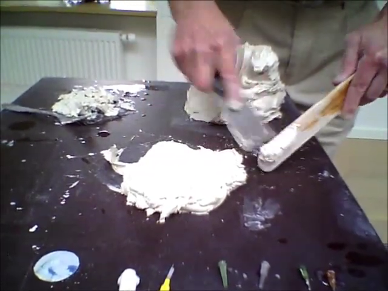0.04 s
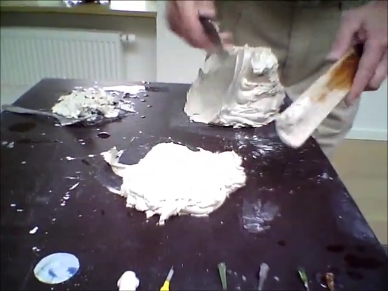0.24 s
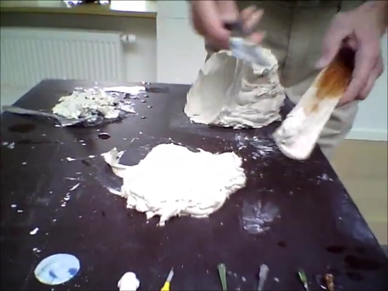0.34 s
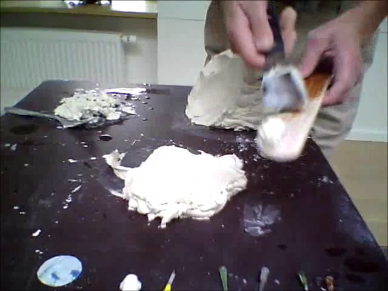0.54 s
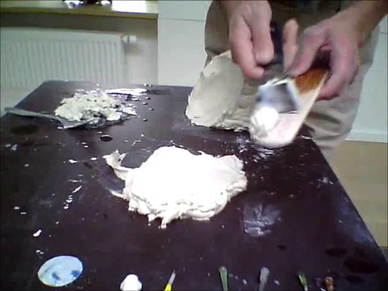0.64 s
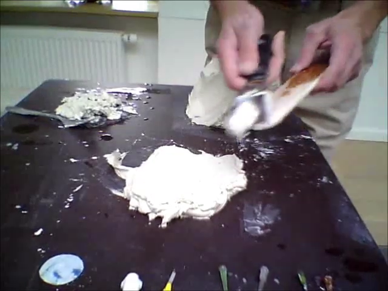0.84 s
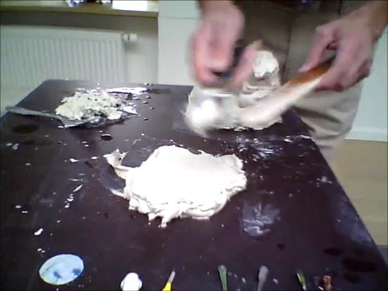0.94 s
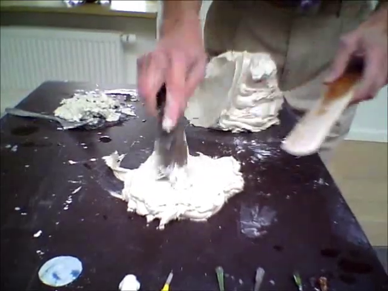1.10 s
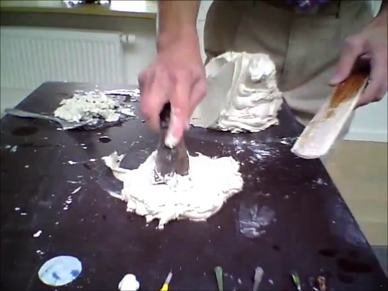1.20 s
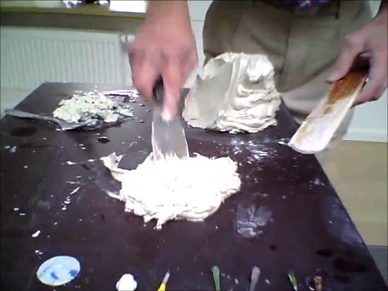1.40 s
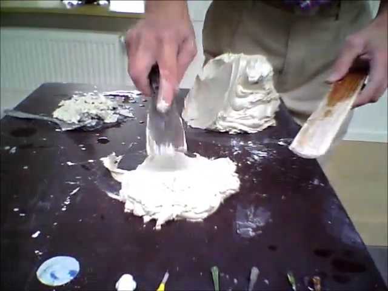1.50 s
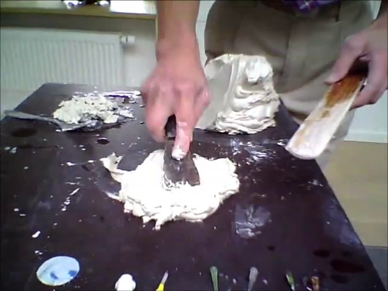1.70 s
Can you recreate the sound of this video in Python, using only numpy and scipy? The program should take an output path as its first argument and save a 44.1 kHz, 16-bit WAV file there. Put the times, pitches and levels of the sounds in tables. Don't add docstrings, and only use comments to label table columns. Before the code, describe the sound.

Steel blade wiping soft clay from wood, quick bright clacks, a light tap and faint smearing.

```python
import sys
import numpy as np
from scipy import signal
from scipy.fft import rfft, irfft
from scipy.io import wavfile

SR = 44100
rng = np.random.default_rng(int(sys.argv[2]) if len(sys.argv) > 2 else 0)


def unload_wav(signal):
    wavfile.write(
        sys.argv[1],
        SR,
        np.round(np.clip(np.atleast_2d(signal).T, -1, 1) * 32767).astype(np.int16),
    )


def attenuation_scalar(level_db):
    decades = np.asarray(level_db, float) / 20
    return 10 ** decades


N = 77175
T = np.arange(N) / SR


def rms_one(x):
    return x / np.sqrt(np.mean(x ** 2) + 1e-20)


def at_hz(points, hz):
    points = np.array(points)
    return np.interp(np.log(hz), np.log(points[:, 0]), points[:, 1])


def drift(rate_hz):
    pole = np.exp(-80 * np.pi * rate_hz / SR)
    noise = rng.standard_normal(N // 40 + 2002)
    slow = signal.lfilter([1], [1, -2 * pole, pole * pole], noise)[2000:]
    return np.interp(np.arange(N) / 40, np.arange(len(slow)), rms_one(slow - slow.mean()))


def band_pass(x, low_hz, high_hz):
    sos = signal.butter(2, [low_hz, high_hz], "band", fs=SR, output="sos")
    return signal.sosfilt(sos, x)


def ring(clicks, hz, t60):
    r = attenuation_scalar(-60 / (t60 * SR))
    w = 2 * np.pi * hz / SR
    return signal.lfilter([0, np.sin(w)], [1, -2 * r * np.cos(w), r * r], clicks + 1e-18)


def resonate(x, peaks):
    out = 0
    for k, (hz, width_hz, db) in enumerate(peaks):
        r = np.exp(-np.pi * width_hz / SR)
        b = [(1 - r * r) / 2, 0, (r * r - 1) / 2]
        a = [1, -2 * r * np.cos(2 * np.pi * hz / SR), r * r]
        out = out + (-1) ** k * attenuation_scalar(db) * signal.lfilter(b, a, x)
    return out


def grit(rate_per_s, spread_db):
    sizes = attenuation_scalar(spread_db * np.minimum(rng.exponential(1, N), 4))
    signs = rng.choice([-1, 1], N)
    return rms_one(sizes * signs * (rng.random(N) < rate_per_s / SR))


def bands(likeness, shape, low_hz, octaves):
    out = 0
    edges = low_hz * 2 ** np.arange(0, octaves, 1 / 3)
    white = rng.standard_normal((2, 2, N + 8000))
    for k, (low, high) in enumerate(zip(edges, edges[1:])):
        mid, side = band_pass(white[k % 2], low, high)[:, 8000:]
        hz = np.sqrt(low * high)
        alike = np.clip(at_hz(likeness, hz), -.99, .99)
        stereo = np.sqrt(1 + alike) * mid + np.sqrt(1 - alike) * side * [[1], [-1]]
        out = out + shape(hz) * stereo
    return out


# (frequency [Hz], density [dB per Hz])
HUSH_SPECTRUM = [(88, -29), (150, -3.5), (232, -15), (346, -14), (797, -20), (1020, -19.5), (1360, -26),
                 (1840, -26.5), (14000, -32)]
# (frequency [Hz], likeness [-1 to 1])
HUSH_STEREO = [(60, -0.57), (180, 0.65), (540, -0.35), (1610, 0.4), (4800, 0.22), (14400, -0.06)]
# (frequency [Hz], density [dB per Hz])
RUMBLE_SPECTRUM = [(20, 4), (45, 1), (90, -3.5), (170, -31.5)]


def background():
    hush = rms_one(bands(HUSH_STEREO, lambda hz: attenuation_scalar(at_hz(HUSH_SPECTRUM, hz) + drift(8)),
                         153.6, octaves=6.8))
    rumble_likeness = [(20, -0.41), (50, -0.41), (80, -0.72), (170, .6)]
    rumble = rms_one(bands(rumble_likeness, lambda hz: attenuation_scalar(at_hz(RUMBLE_SPECTRUM, hz) + 2.6 * drift(3)),
                           12, octaves=3.8))
    rumble_pan_db = -3.5
    rumble = rumble * attenuation_scalar([[rumble_pan_db / 2], [-rumble_pan_db / 2]])
    motor = rms_one(resonate(rng.standard_normal(N), [(134, 12, 0)]))
    whine = rms_one(resonate(rng.standard_normal(N), [(13600, 60, 0)]))
    return attenuation_scalar(-69) * hush + attenuation_scalar(-59.5) * rumble + attenuation_scalar(-71.5) * motor + attenuation_scalar(-86.5) * whine


# (frequency [Hz], width [Hz], level [dB])
KNOCK_RINGS = [(323, 15, -9), (710, 79, 1), (2750, 380, -6)]


def earlier_knock():
    level_db, t60 = -51, .2
    fade = attenuation_scalar(level_db - 60 * T / t60)
    return fade * rms_one(resonate(rng.standard_normal(N), KNOCK_RINGS))


# (time [s], level [dB], brightness [dB])
SMEAR_PRESSURE = [(0, -52, -1.5), (0.043, -60, -0.9), (0.172, -61.5, -0.5), (.2, -51, 2.5), (.25, -46, -6),
                  (.42, -66, -0.8), (.59, -72, -2.5), (.64, -65, 0.1), (.68, -79, -2), (.758, -89, 6),
                  (0.77, -68.5, 7.5), (.85, -64, 2.5), (.9, -66, -4), (1.001, -64.5, 1.5),
                  (1.2, -73.5, -2.5), (1.26, -71, 4), (1.32, -69.5, -4.5), (1.75, -84, -9)]
# (frequency [Hz], width [Hz], level [dB])
SMEAR_BODY = [(330, 200, -10.5), (800, 570, -8), (1920, 464, -2.5), (2700, 790, -4.5), (3500, 730, -3),
              (4670, 800, -8.5)]
# (frequency [Hz], width [Hz], level [dB])
SMEAR_HISS = [(7230, 2900, -8.5), (8500, 1800, -6), (11600, 2800, -12.5)]


def smear():
    s, db, bright_db = np.transpose(SMEAR_PRESSURE)
    grains = grit(rate_per_s=4000, spread_db=1) * attenuation_scalar(1.5 * drift(28))
    low = 0
    for k, peak in enumerate(SMEAR_BODY):
        wander = attenuation_scalar(1.5 * drift(7.2))
        low = low + (-1) ** k * resonate(grains, [peak]) * wander
    high = resonate(grains, SMEAR_HISS) * attenuation_scalar(np.interp(T, s, bright_db))
    return attenuation_scalar(np.interp(T, s, db)) * (low + high) / np.std(low)


def rattling():
    return grit(rate_per_s=12000, spread_db=3)


def burst(chatter, s, length):
    u = np.maximum(T - s, 0) / length
    x = chatter * u * np.exp(-u)
    return x / np.sqrt(np.sum(x ** 2))


def crack(x):
    return band_pass(x, 1740, 13000)


def strike(bursts, db, hz, t60):
    reach = np.abs(bursts @ np.exp(2j * np.pi * hz * T))
    return ring((attenuation_scalar(db) / np.maximum(reach, .4)) @ bursts, hz, t60)


# (time [s], level [dB], chatter length [s], favoured pitch [Hz], crack [dB])
EDGE_CONTACTS = [(0.198, -40, 0.0053, 4200, 3), (0.21, -24.5, 0.002, 3640, -9),
                 (.2150, -23.5, .0016, 920, -10), (0.2211, -31.5, 0.00085, 3500, 7),
                 (0.2237, -15.5, 0.00087, 3820, -6), (.2280, -28.5, 0.0018, 1330, -33),
                 (0.2403, -25, 0.0009, 1960, -5.5), (0.243, -30.5, 0.0028, 1500, -2),
                 (1.3403, -48, 0.00018, 765, -25), (1.3426, -53.5, 0.00056, 2020, 1.5),
                 (1.6107, -46.5, 0.00075, 3250, -16), (1.6133, -54, 0.0017, 800, -28.5),
                 (1.624, -67, .003, 3600, -34.5)]
# (frequency [Hz], level [dB], t60 [s])
BODY_MODES = [(190, -7.5, 0.05), (308, -13.5, 0.081), (574, -11.5, 0.038), (748, -6, 0.042),
              (978, -2.5, 0.018), (1330, -7, 0.021), (1608, -1.5, .014), (2154, -8, 0.013),
              (2612, -4, 0.014), (3120, -8, 0.0085), (3626, -3, 0.013), (4233, 0, 0.0098),
              (5130, -12, 0.0059), (6430, -9, 0.011)]


def clatter():
    favour_db_per_octave = 4.5
    chatter = rattling()
    bursts = np.array([burst(chatter, s, length) for s, _, length, *_ in EDGE_CONTACTS])
    level_db, _, favoured_hz, crack_db = np.array(EDGE_CONTACTS)[:, 1:].T
    out = 10 * crack(attenuation_scalar(level_db + crack_db) @ bursts)
    for k, (hz, db, t60) in enumerate(BODY_MODES):
        octaves_off = np.abs(np.log2(hz / favoured_hz))
        mode_db = level_db + db - favour_db_per_octave * octaves_off
        out += (-1) ** k * strike(bursts, mode_db, hz, t60)
    return out


# (frequency [Hz], level [dB], t60 [s])
PADDLE_MODES = [(520, -20.5, 0.017), (1090, -5, 0.031), (2034, -2, 0.016), (2240, -2, 0.019),
                (2700, -6.5, 0.015), (3440, -7, 0.016), (3950, -7.5, 0.02), (4680, -11, 0.009)]


def tap():
    rattle = burst(rattling(), s=.7648, length=0.00094)
    rings = sum(strike(rattle[None], np.array([db]), hz, t60) for hz, db, t60 in PADDLE_MODES)
    return attenuation_scalar(-37) * (rings + 10 * attenuation_scalar(-14) * crack(rattle))


# (time [s], level [dB])
PRESS_LEVEL = [
    (.95, -77),
    (1.1, -69),
    (1.2, -71),
    (1.3, -77.5),
    (1.4, -87),
]
# (frequency [Hz], width [Hz], level [dB])
CLAY_RINGS = [(252, 92, -0.5), (560, 380, -3.5), (1000, 270, -3.5), (1500, 380, -7.5)]


def press():
    s, db = np.transpose(PRESS_LEVEL)
    squelch = rms_one(resonate(grit(3600, 2.2), CLAY_RINGS)) * attenuation_scalar(np.interp(T, s, db))
    thud_s, soft_s = 1.255, .0022
    push = np.exp(-((T - thud_s) / soft_s) ** 2)
    thud = strike(push[None] / push.sum(), np.array([-54.5]), hz=101, t60=.12)
    return squelch + thud


# (time [s], length [s], level [dB])
EDGE_SLIPS = [
    (1.027, 0.0245, -56.5),
    (1.052, 0.02, -51),
]
# (frequency [Hz], width [Hz], level [dB])
EDGE_RINGS = [
    [(2270, 470, -9.5), (4960, 630, -11), (8450, 900, -14.5), (12500, 1100, -17)],
    [(2030, 520, -5), (3510, 170, 3.5), (4700, 340, -9.5), (6540, 1100, -12), (9600, 3400, -18.5)],
]


def slips():
    grains = grit(9000, 1.6) * attenuation_scalar(3.6 * drift(86))
    out = 0
    for (s, length, db), rings in zip(EDGE_SLIPS, EDGE_RINGS):
        stroke = np.sin(np.pi * np.clip((T - s) / length, 0, 1)) ** 0.48
        rasp = resonate(grains * stroke, rings)
        out = out + attenuation_scalar(db) * rasp / np.std(rasp) * np.std(stroke)
    return out


# (frequency [Hz], left port's lead [rad])
LEFT_LEAD = [(300, .15), (5000, 0.17), (7500, 1.2), (13000, 1.4)]
# (frequency [Hz], left minus right [dB])
LEFT_TILT = [(100, 3), (700, 1.5), (2500, -1.5), (7800, 1.2), (13000, 3.5)]


def ports(x):
    hz = np.maximum(np.fft.rfftfreq(N, 1 / SR), 1)
    half = attenuation_scalar(at_hz(LEFT_TILT, hz) / 2) * np.exp(.5j * at_hz(LEFT_LEAD, hz))
    return irfft(rfft(x) * np.array([half, 1 / half]), N)


def echo(x, tail, db):
    tail = tail / np.sqrt(np.sum(tail ** 2) / 2)
    return attenuation_scalar(db) * signal.fftconvolve(x[None], tail, axes=1)[:, :N]


def bench(x):
    t = np.arange(2000) / SR
    t60, first_s = .016, .0004
    echoes = rng.standard_normal(len(t)) * [[1], [-1]] * attenuation_scalar(-60 * t / t60) * (t > first_s)
    echoes = signal.sosfilt(signal.butter(2, 1790, "high", fs=SR, output="sos"), echoes)
    return echo(x, echoes, db=-8.5)


# (frequency [Hz], t60 [s])
ROOM_DECAY = [(200, .6), (1000, 0.64), (3000, 0.71), (6000, 0.29), (12000, 0.29)]
# (frequency [Hz], level [dB])
ROOM_TONE = [(150, 3.5), (500, 0), (900, -8.5), (1600, -10), (2600, -2), (4100, -6.5), (5500, 1.5),
             (13000, 0.5)]
# (frequency [Hz], likeness [-1 to 1])
ROOM_STEREO = [(200, 0.91), (1500, .6), (5000, 0.14), (12000, .05)]


def workshop(x):
    def fade(hz):
        return attenuation_scalar(at_hz(ROOM_TONE, hz) - 60 * T / at_hz(ROOM_DECAY, hz))

    onset_s = .005
    tail = bands(ROOM_STEREO, fade, 100, octaves=7.4)
    tail = tail * (1 - np.exp(-(T / onset_s) ** 2))
    return echo(x, tail, db=-13)


def scene():
    tools = smear() + clatter() + tap() + press() + slips()
    direct = ports(tools + earlier_knock())
    return direct + bench(tools) + workshop(tools) + background()


def band_limit(x):
    return signal.sosfilt(signal.butter(12, 14960, fs=SR, output="sos"), x)


def record(dry):
    low_pass = signal.cheby2(14, 30, 14150, fs=SR, output="sos")
    mix = signal.sosfilt(low_pass, dry)
    return band_limit(mix)


dry = scene()
out = record(dry)
unload_wav(out)
```